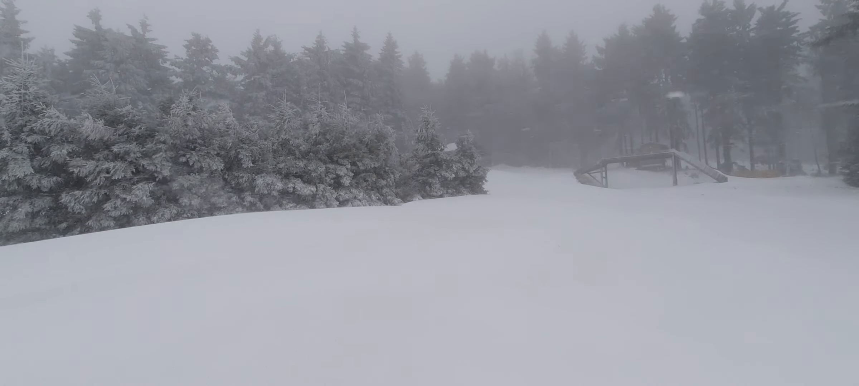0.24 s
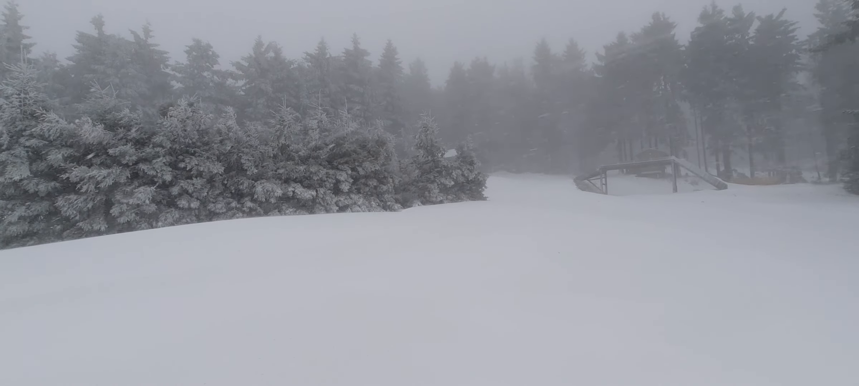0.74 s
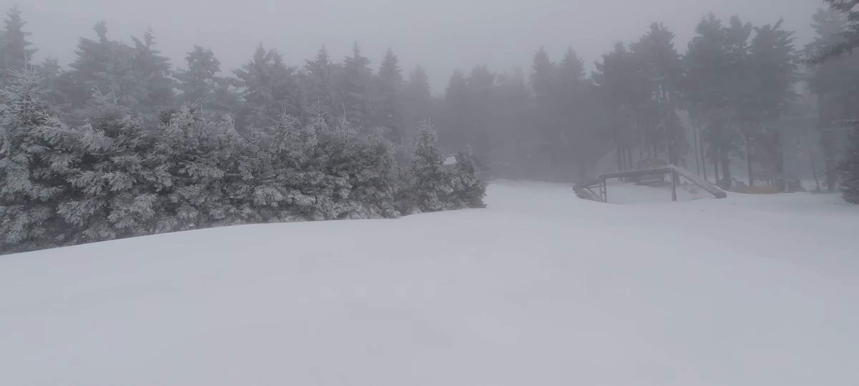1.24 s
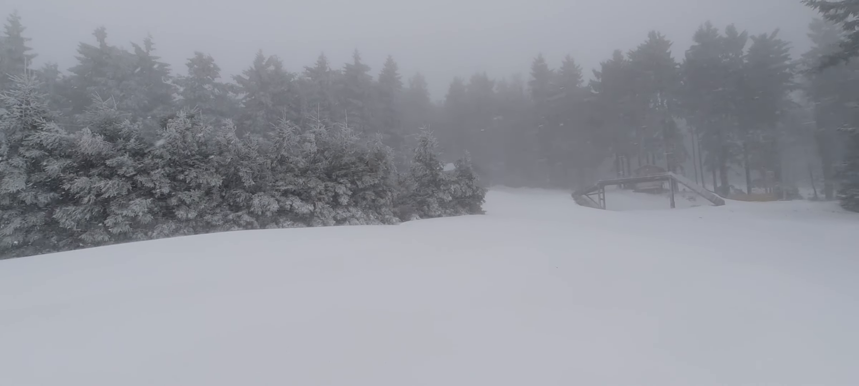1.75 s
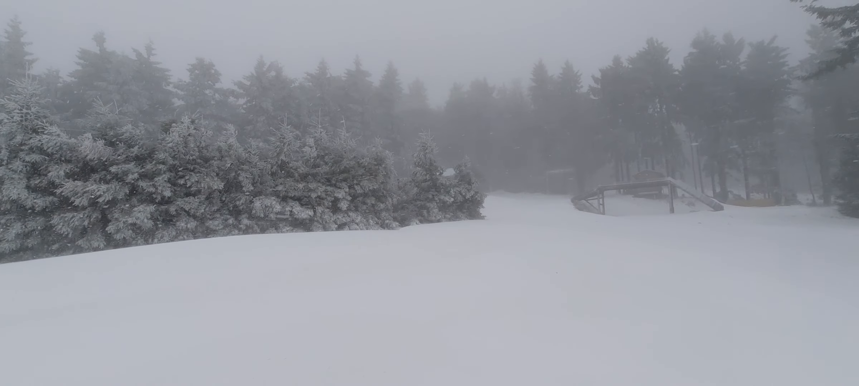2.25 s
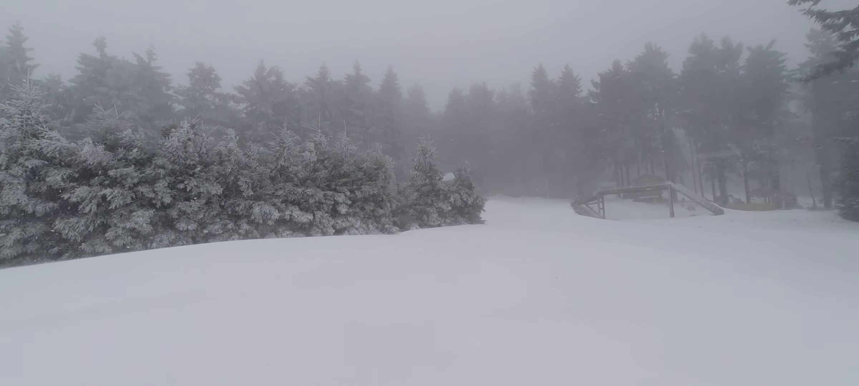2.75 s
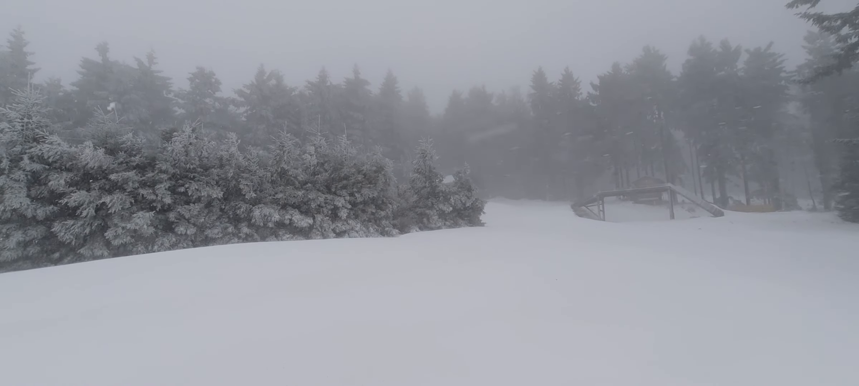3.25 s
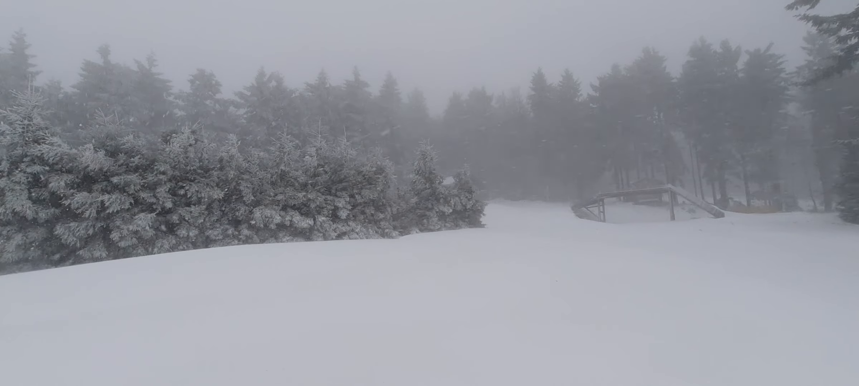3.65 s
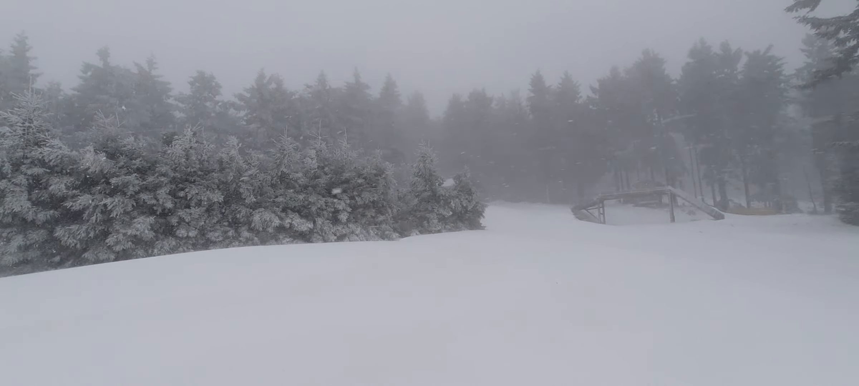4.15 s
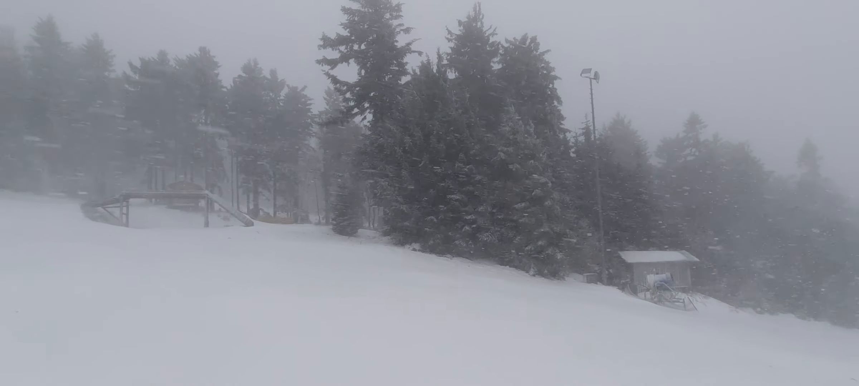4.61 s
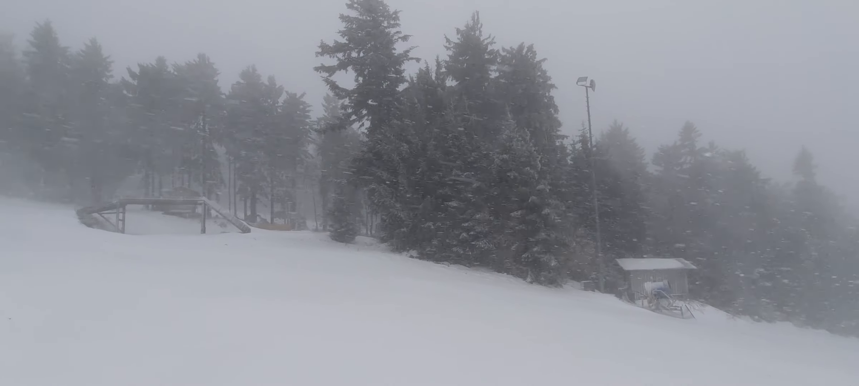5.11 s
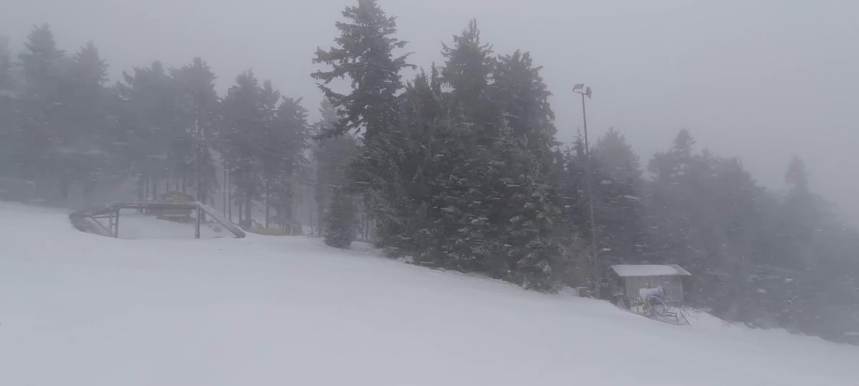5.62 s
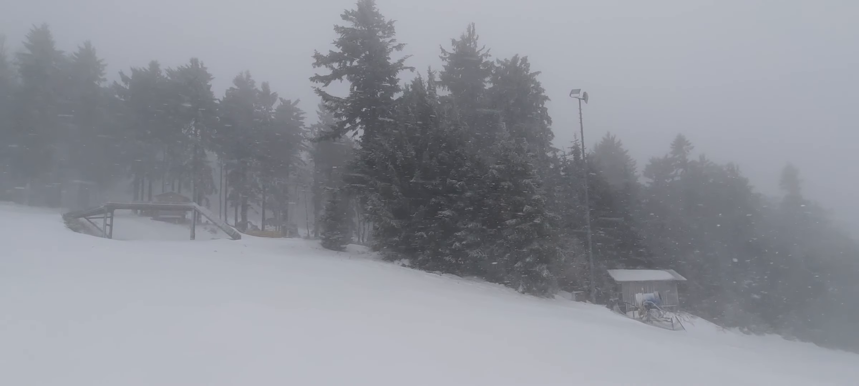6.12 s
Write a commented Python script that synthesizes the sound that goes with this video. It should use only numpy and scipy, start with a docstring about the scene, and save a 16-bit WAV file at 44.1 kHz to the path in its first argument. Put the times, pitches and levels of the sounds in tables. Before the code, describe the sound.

Close, rough wind noise in a snowstorm, with no voices. Uneven bursts and short dips shake both sides over a deep rumble, building, peaking and dying down midway. The wind then comes back heavier on the left; the right sings hollowly for an instant and becomes a continuous streaming roar with hiss. Blown snow adds a very faint bright hiss and a few tiny clicks.

```python
"""Gusts buffet the two ports of a hand-held microphone in a snowstorm on an open slope; they swell, ease and return.
Fluttering, filtered noise makes a ragged rush over a booming rumble. Strong eddies and lulls hit both ports
together, small eddies each alone, until in the last gust the right side drones for a moment, then flips to
an even, streaming roar; the left stays buffeted.
Blown snow hisses faintly behind as lumpy bright noise, with a few small clicks of decaying noise."""
import sys
import numpy as np
from scipy import signal
from scipy.fft import rfft, irfft, next_fast_len
from scipy.io import wavfile
from scipy.ndimage import uniform_filter1d, minimum_filter1d

SR = 44100
rng = np.random.default_rng(int(sys.argv[2]) if len(sys.argv) > 2 else 0)


def dump(signal):
    """Clip the signal to [-1, 1] and save it as 16-bit WAV at the path in sys.argv[1]."""
    limited = np.clip(np.atleast_2d(signal).T, -1, 1)
    pcm = np.round(limited * 32767).astype(np.int16)
    wavfile.write(sys.argv[1], SR, pcm)


N = 280944

# rush level at which its spectrum has its plain colour, before each port's trim
NOMINAL_RUSH_DB = -16
# the second gust meets the microphone from another angle: the left port booms more,
# the right one drones, then streams
TURN_S, STREAM_START_S = 4.022, 4.277
# bands in which coloured noise is set to rms 1: (low Hz, high Hz)
RUMBLE_BAND, DRONE_BAND, RUSH_BAND = (40, 240), (270, 520), (500, 2000)
SIZZLE_BAND, SNOW_BAND = (3000, 6500), (10500, 15500)


def left_port():
    """Buffeted from start to end, with a heavier rumble in the second gust."""
    rush_db, rumble_db = buffeting(lean_share=0, rumble_db=-21.0, rumble_follows=0.59, thump=1.0)
    rumble_db = rumble_db + 8 * from_moment(TURN_S)
    tearing = from_db(-4.5) * rush(rush_db, flutter_db=2.5, spike_db=3.5, own_db=2.0)
    return tearing + rumble(rumble_db)


def right_port():
    """Buffeted at first, rumbling mostly in thumps; then a short drone; then it flips to an even roar."""
    drone_rush_db, drone_rumble_db = -20, -13   # steady levels under the drone, before the trims below
    rush_db, rumble_db = buffeting(lean_share=0.78, rumble_db=-32.0, rumble_follows=0.94, thump=2.05)
    rumble_db = rumble_db + 2.3 * drift(rate=5.9)
    turned, even = from_moment(TURN_S), from_moment(STREAM_START_S)
    rush_db = (1 - turned) * rush_db + turned * drone_rush_db
    rumble_db = (1 - turned) * rumble_db + turned * drone_rumble_db
    tearing = from_db(-3.5) * rush(rush_db, flutter_db=2.5, spike_db=2.5, own_db=3.5)
    buffeted = tearing + from_db(-3.0) * rumble(rumble_db)
    return (1 - even) * (buffeted + drone()) + even * stream()


def buffeting(lean_share, rumble_db, rumble_follows, thump):
    """Levels at a port: the rush goes with the wind, the rumble more gently; thump scales the eddies' push."""
    # One gust swells and eases, a second one follows. Each row: time in seconds,
    # rush level in dB before eddies and trims, lean towards the right port in dB before lean_share.
    wind = [(0.0, -29, -2.5), (0.24, -38.5, 2.5), (0.73, -27, 2), (0.87, -30.5, 1), (1.3, -19.5, -1.5),
            (1.42, -21.5, 1), (1.75, -21.5, 0.5), (2.0, -22.5, -0.5), (2.2, -17, 0.5), (2.55, -20.5, 3),
            (3.05, -25.5, 5), (3.45, -36, 8), (3.9, -28, 1.5), (4.05, -22, 2), (4.2, -35.5, 0),
            (4.8, -21.5, 2), (5.25, -29.5, 0), (6.37, -25.5, 0)]
    wind_db, lean_db = in_time(wind)
    tear_db, push_db = eddies()
    rush_db = wind_db + lean_share * lean_db + tear_db
    return rush_db, rumble_db + rumble_follows * (wind_db - NOMINAL_RUSH_DB) + thump * push_db


def eddies():
    """What the air adds to a port's rush and rumble, in dB: fixed strong eddies and lulls, random small eddies."""
    # The strongest eddies, at both ports until the right one drones and streams, then on the left only.
    # Each row: peak time in seconds, fade in seconds, rush rise in dB, rumble rise in dB before the port's thump.
    strong = [(0.36, 0.011, 11, 6), (0.458, 0.0093, 10, -1), (0.68, 0.09, 7, 7), (0.986, 0.024, 6, -1),
              (1.155, 0.014, 7.5, -10), (1.247, 0.031, 10, 1), (1.614, 0.013, 5.5, 3),
              (1.691, 0.022, 3.5, 3), (1.76, 0.024, 9.5, 5), (1.835, 0.078, 5.5, 5.5),
              (1.978, 0.031, 8.5, 4), (2.027, 0.0072, 5, 8), (2.09, 0.06, 7, -2), (2.218, 0.038, 4.5, 3),
              (2.293, 0.0087, 16, -4), (2.561, 0.044, 5.5, 3.5), (3.008, 0.032, 5, 3),
              (3.576, 0.066, 4.5, 5.5), (3.792, 0.026, 9, 5), (3.944, 0.037, 10.5, 14.5),
              (3.988, 0.019, 5, 0), (4.085, 0.027, 7, 7), (4.306, 0.037, 11, 13), (4.426, 0.054, 8, 10.5),
              (4.487, 0.02, 10, 4.5), (4.701, 0.011, 13, 10), (4.81, 0.052, 5, 3.5), (4.91, 0.022, -1, 11),
              (5.152, 0.028, 5, 7.5), (5.425, 0.018, 10, 8), (5.527, 0.065, 11.5, 4), (5.611, 0.033, 8, 5),
              (5.711, 0.032, 9.5, 4), (5.974, 0.016, 10.5, 7.5), (6.062, 0.011, 8, 4),
              (6.342, 0.034, 14, 6)]
    # The air falls slack for a moment, at the same ports as the strong eddies.
    # Each row: time in seconds, fade in seconds, rush drop in dB.
    lulls = [(0.395, 0.01, 13), (0.585, 0.15, 3.5), (1.044, 0.023, 8), (1.205, 0.013, 7.5),
             (1.405, 0.045, 6), (2.005, 0.0071, 11), (2.635, 0.079, 2.5), (3.076, 0.02, 7),
             (3.885, 0.031, 6.5), (4.61, 0.04, 10), (4.949, 0.041, 12), (5.312, 0.026, 22),
             (5.807, 0.03, 12)]
    # small eddies come at random, one in each equal slot of time; these are their averages
    count, fade_s, rush_db, rumble_db = 80, 0.018, 4.5, 2.6
    when, length, tear, push = rng.random((count, 4)).T
    small_s = (np.arange(count) + when) * N / SR / count
    small = np.column_stack([small_s, fade_s * (.5 + length), rush_db * (.5 + tear), rumble_db * 2 * push])
    s, fade, rush_rise, rumble_rise = np.vstack([strong, small]).T
    tear_db = swells(s, fade, rush_rise) - swells(*np.transpose(lulls))
    return tear_db, swells(s, fade, rumble_rise)


def rush(level_db, flutter_db, spike_db, own_db):
    """Air tears at a port: it flutters, breaks into millisecond spikes, and brightens with every surge."""
    # Faster air makes smaller eddies. Each row: frequency in Hz, dB gained per dB of surge.
    steepness = [(300, 0.88), (900, 0.91), (2500, 1.37), (6000, 1.9958)]
    # The ports ring near 310 and 800 Hz. Each row: frequency in Hz, relative density in dB per Hz.
    rush_colour = [(60, -39), (170, -25.5), (240, -5), (310, 4.5), (400, 0.5), (560, -1.5), (800, 3),
                   (1200, -3), (1700, -7), (2500, -14.5), (3600, -24), (5300, -33), (8000, -45.5),
                   (9500, -58.5)]
    surge_db = level_db - NOMINAL_RUSH_DB + flutter_db * drift(rate=58) + spike_db * drift(rate=420)
    # the hardest surges, around 20 dB over nominal and up, level off
    surge_db = surge_db - 1.3 * np.logaddexp(0, (surge_db - 20) / 3)
    white = rfft(rng.standard_normal(N))
    pressure = 0
    # overlapping frequency zones, one for each eddy size
    for zone, (_, steep) in zip(np.eye(len(steepness)), steepness):
        share = at_hz([(hz, part) for (hz, _), part in zip(steepness, zone)])
        # each eddy size also comes and goes alone, the large ones most
        lumps_db = own_db / steep * drift(rate=78)
        pressure = pressure + irfft(white * share, N) * from_db(steep * surge_db + lumps_db)
    return from_db(NOMINAL_RUSH_DB) * coloured(pressure, rush_colour, RUSH_BAND)


def rumble(level_db):
    """Large eddies push on the diaphragm itself."""
    # Boom of the pushed diaphragm. Each row: frequency in Hz, relative density in dB per Hz.
    rumble_colour = [(15, -43), (30, -22), (60, -2.5), (110, -0.5), (170, -2.5), (230, -6), (305, -1.5),
                     (400, -8), (560, -15), (800, -26), (2000, -49), (6000, -80.5)]
    return from_db(level_db) * coloured(turbulence(depth_db=4.5, rate=270), rumble_colour, RUMBLE_BAND)


def stream():
    """Even flow along the port: a rolling roar under a sizzle; it darkens as the sizzle sinks against it."""
    # Even flow along the right port. Each row: time in seconds, roar level in dB,
    # sizzle level in dB before its trim.
    flow = [(4.29, -16.5, -19.5), (4.62, -12.5, -24), (4.8, -15.5, -25), (4.96, -13, -25), (5.06, -13, -31),
            (5.125, -18.5, -40), (5.19, -14.5, -27), (5.29, -16, -25.5), (5.39, -17, -29),
            (5.74, -17.5, -27), (5.85, -14, -23.5), (6.02, -14.5, -29), (6.35, -13.5, -20)]
    # Body of the roar. Each row: frequency in Hz, relative density in dB per Hz.
    roar_colour = [(20, -25), (60, -27), (110, -10.5), (190, -10.5), (235, -21), (305, 5.5), (400, 1),
                   (560, 0), (800, -2.5), (1300, -1.5), (1800, -5.5), (2500, -12.5), (3600, -22.5),
                   (7000, -70)]
    # Sizzle on top. Each row: frequency in Hz, relative density in dB per Hz.
    sizzle_colour = [(1200, -23), (2500, 5.5), (3600, 2), (4500, 3.5), (5400, 2.5), (6500, -12),
                     (8000, -32), (9500, -42.5)]
    edge_hz, edge_follows = 1550, 0.65   # above this the roar takes a share of the sizzle's swing
    usual_sizzle_db = -10.5   # sizzle against roar, before the sizzle's trim
    roar_db, sizzle_db = in_time(flow)
    roar = coloured(turbulence(depth_db=0.44, rate=82), roar_colour, RUSH_BAND)
    roar = from_db(roar_db + 0.99 * drift(rate=28)) * roar
    body = signal.sosfiltfilt(signal.butter(2, edge_hz, fs=SR, output="sos"), roar)
    edge = from_db(edge_follows * (sizzle_db - roar_db - usual_sizzle_db)) * (roar - body)
    sizzle = coloured(turbulence(depth_db=2.0, rate=29), sizzle_colour, SIZZLE_BAND)
    return body + edge + from_db(sizzle_db - 2.5) * sizzle


def drone():
    """The flow sings in the right port like a bottle neck and spits on its edge, steadily fading."""
    # Hollow tone. Each row: frequency in Hz, relative density in dB per Hz.
    hollow_colour = [(60, -16), (220, -8), (300, 2.5), (370, 5), (480, -5.5), (620, -6.5), (1200, -59),
                     (4000, -84)]
    # Spitting hiss that rides on it. Each row: frequency in Hz, relative density in dB per Hz.
    spit_colour = [(1000, 9), (2500, 4), (4000, -6), (6000, -5.5), (7300, -16), (8500, -32), (9500, -47),
                   (13000, -28), (16000, -33)]
    start_db, sag_db_per_s = -15, 37   # start level before the two trims below
    drone_db = start_db - sag_db_per_s * np.maximum(np.arange(N) / SR - TURN_S, 0)
    hollow = from_db(5.0) * coloured(turbulence(depth_db=2.5, rate=23), hollow_colour, DRONE_BAND)
    spit = from_db(-13.5) * coloured(turbulence(depth_db=7.0, rate=350), spit_colour, SIZZLE_BAND)
    return from_moment(TURN_S) * from_db(drone_db) * (hollow + spit)


def snow():
    """Countless fine grains sweep over the housing in flurries, mostly on the right: lumpy bright noise."""
    # Flurries of blown snow. Each row: time in seconds, hiss level in dB before each side's trim.
    flurries = [(0.05, -80.5), (1.16, -65), (1.28, -68.5), (2.08, -62), (2.1, -57.5), (3.19, -63.5),
                (4.09, -63), (5.1, -73.5), (6.28, -67.5)]
    # Hiss on the left. Each row: frequency in Hz, relative density in dB per Hz.
    left_colour = [(500, 2), (3000, -6), (5500, -6), (8200, 0), (9200, -9.5), (12500, 0), (15800, -7)]
    # Hiss on the right. Each row: frequency in Hz, relative density in dB per Hz.
    right_colour = [(500, -2), (3000, 18), (5800, 18), (8000, 6), (9400, -4), (12500, 8), (15800, -6.5)]
    hiss_db, = in_time(flurries)
    left = from_db(1.0) * coloured(turbulence(depth_db=-3.5, rate=200), left_colour, SNOW_BAND)
    right = from_db(5.0) * coloured(turbulence(depth_db=6.5, rate=144), right_colour, SNOW_BAND)
    return from_db(hiss_db) * np.array([left, right])


def ticks(decay_s):
    """Tiny bright cracks, nearly all on the right: high-passed noise that dies away within milliseconds."""
    # Small clicks, the loudest as the right side flips to its even roar.
    # Each row: start in seconds, level in dB before the high-pass and each side's trim.
    clicks = [(0.2957, -41), (4.276, -26), (4.6874, -36), (6.3253, -28.5)]
    out, age = np.zeros((2, N)), np.arange(SR // 100) / SR
    for s, level_db in clicks:
        start = int(s * SR)
        crack = np.exp(-age / decay_s) * rng.standard_normal((2, len(age)))
        out[:, start:start + len(age)] += from_db(level_db) * crack
    bright = signal.sosfilt(signal.butter(2, 3000, "high", fs=SR, output="sos"), out)
    return from_db([[-14], [3]]) * bright


def turbulence(depth_db, rate):
    """White noise that comes in lumps; rms 1."""
    x = rng.standard_normal(N) * from_db(depth_db * np.clip(drift(rate), -3, 3))
    return x / x.std()


def drift(rate):
    """Smooth chance of spread 1 that changes up to about rate times a second."""
    size = next_fast_len(N, real=True)
    hz = np.arange(size // 2 + 1) * SR / size
    slow = irfft(rfft(rng.standard_normal(size)) / (1 + (hz / rate) ** 2), size)[:N]
    return (slow - slow.mean()) / slow.std()


def swells(times, fades, heights):
    """A sum of short swells; each arrives quickly and leaves more slowly."""
    arrival_share = 0.35   # a swell arrives in this share of the time it takes to fade
    out = np.zeros(N)
    for s, fade, height in zip(times, fades, heights):
        first, last = max(0, int((s - 3 * fade) * SR)), min(N, int((s + 3 * fade) * SR))
        near = np.arange(first, last)
        age = near / SR - s
        width = np.where(age < 0, arrival_share * fade, fade)
        out[near] += height * np.exp(-(age / width) ** 2)
    return out


def coloured(x, spectrum, band):
    """Causal filter with the given spectrum; white noise of rms 1 leaves it with rms 1 inside the band."""
    gain = from_db(at_hz(spectrum))
    low, high = (int(edge * N / SR) for edge in band)
    gain = gain / np.sqrt(np.sum(gain[low:high] ** 2) / len(gain))
    cepstrum = irfft(np.log(gain), N)
    cepstrum[1:N // 2] *= 2     # minimum phase: resonances ring after a push, never before
    cepstrum[N // 2 + 1:] = 0
    response = irfft(np.exp(rfft(cepstrum)), N)[:SR // 10]
    return signal.fftconvolve(x, response)[:N]


def from_db(db):
    """Decibels to gain."""
    return 10 ** (np.asarray(db) / 20)


def from_moment(start_s):
    """0 before the moment, 1 from about two milliseconds after it."""
    return np.clip((np.arange(N) / SR - start_s) / 0.0021, 0, 1)


def in_time(rows):
    """Each column of a curve, one value a sample."""
    s, *columns = np.transpose(rows)
    return [np.interp(np.arange(N) / SR, s, c) for c in columns]


def at_hz(points):
    """A table over log frequency, read at every bin."""
    hz, values = np.transpose(points)
    return np.interp(np.log(np.arange(N // 2 + 1) * SR / N + 1), np.log(hz), values)


def scene():
    """The two ports carry separate noise, with snow and clicks behind it."""
    return np.array([left_port(), right_port()]) + snow() + ticks(decay_s=0.0013)


def record(dry):
    """A fast limiter holds each side under full scale; then a steep low-pass cuts the top."""
    room = np.minimum(1, .97 / (np.abs(dry) + 1e-9))
    held = minimum_filter1d(room, size=161, axis=1)
    gain = uniform_filter1d(held, size=161, axis=1)
    top_cut = signal.ellip(10, .1, 80, 15900, fs=SR, output="sos")   # order, ripple dB, stop dB, Hz
    return signal.sosfilt(top_cut, dry * gain)


dry = scene()
out = record(dry)
dump(out)
```